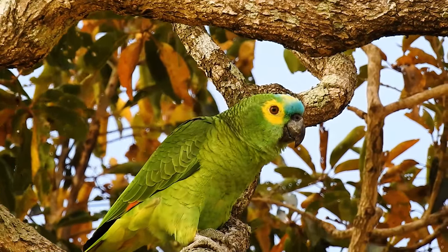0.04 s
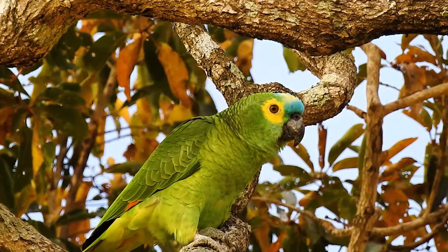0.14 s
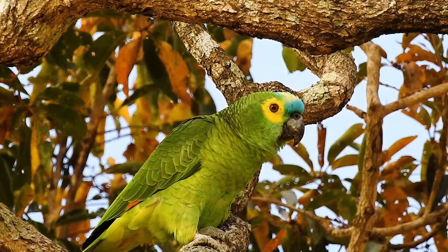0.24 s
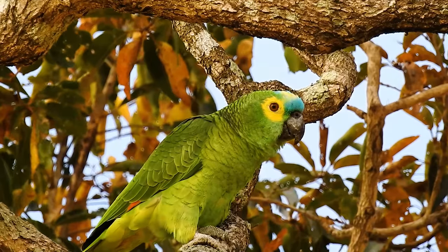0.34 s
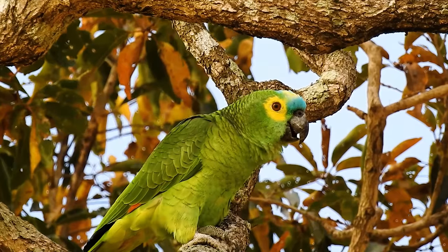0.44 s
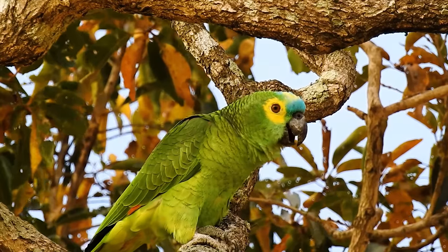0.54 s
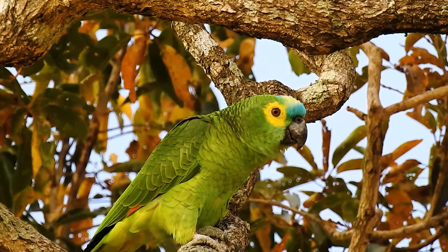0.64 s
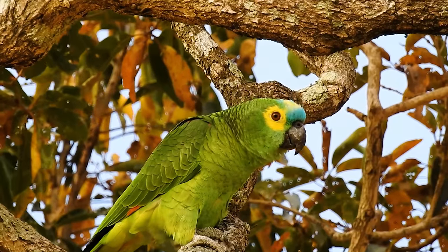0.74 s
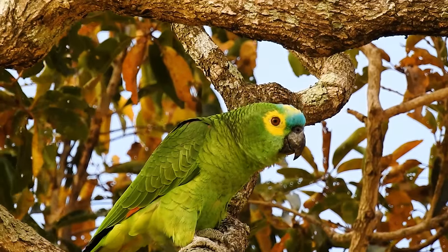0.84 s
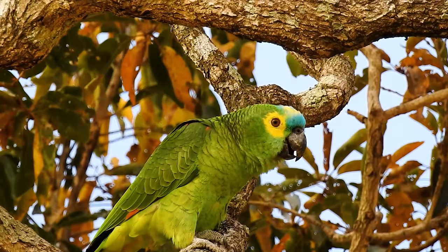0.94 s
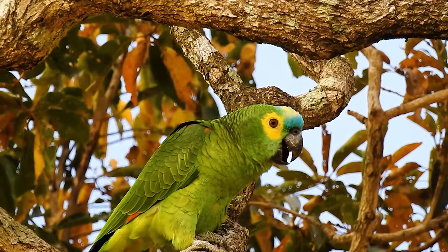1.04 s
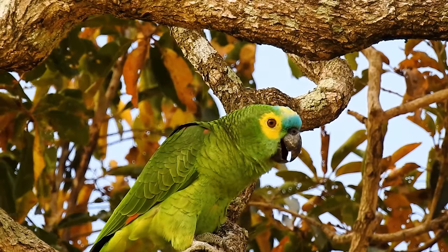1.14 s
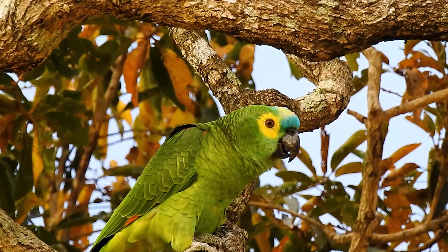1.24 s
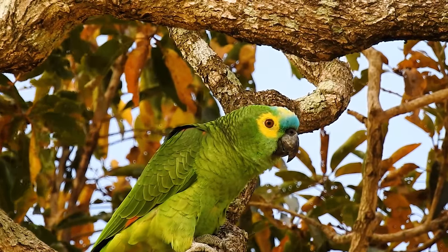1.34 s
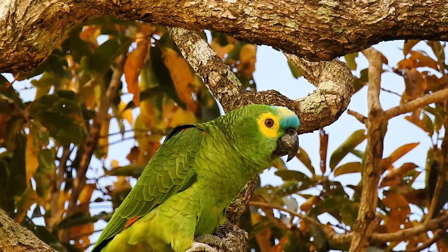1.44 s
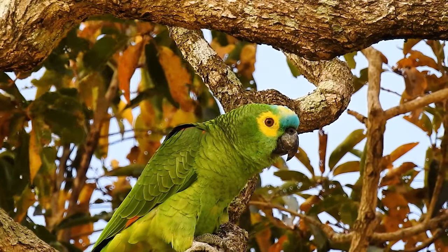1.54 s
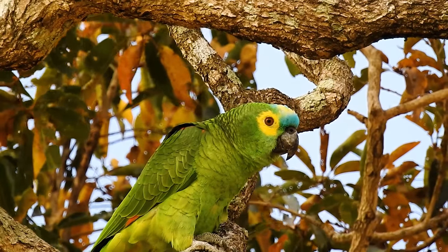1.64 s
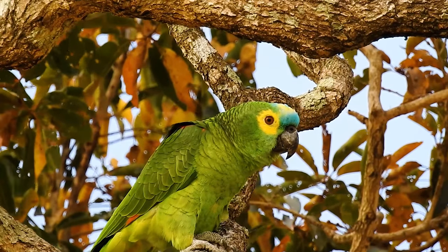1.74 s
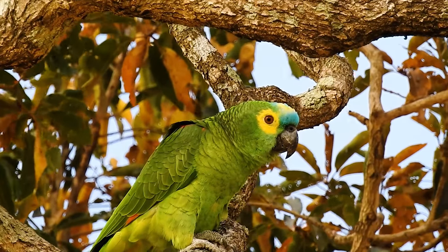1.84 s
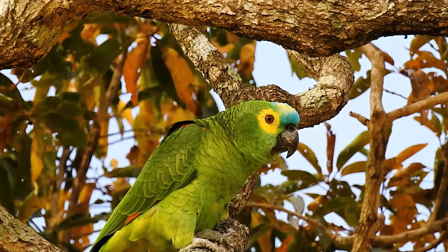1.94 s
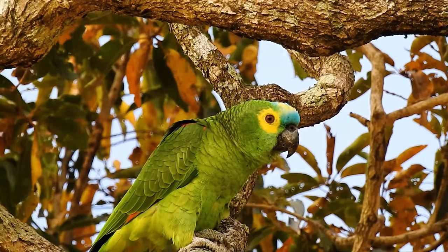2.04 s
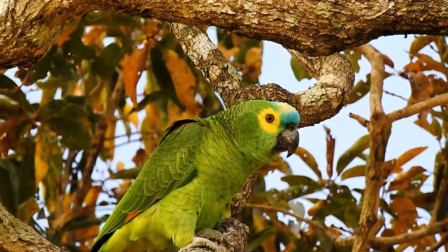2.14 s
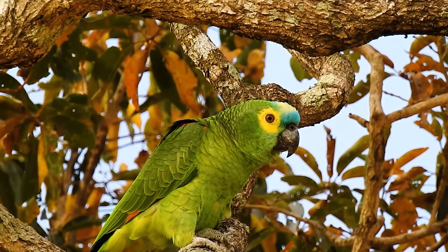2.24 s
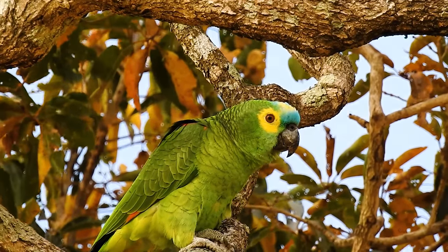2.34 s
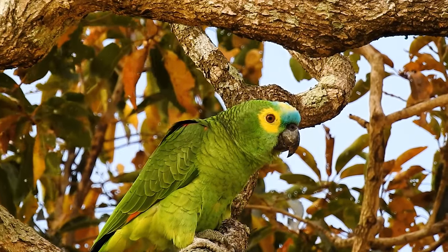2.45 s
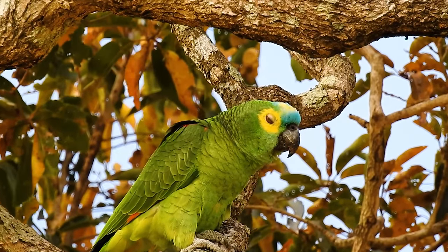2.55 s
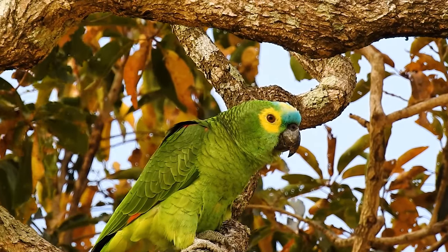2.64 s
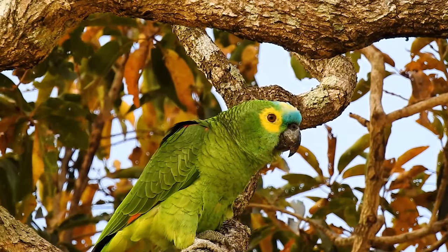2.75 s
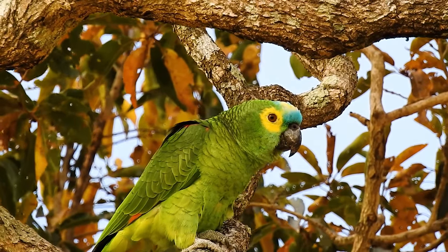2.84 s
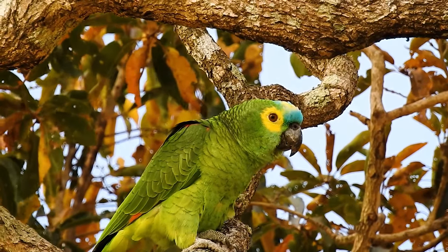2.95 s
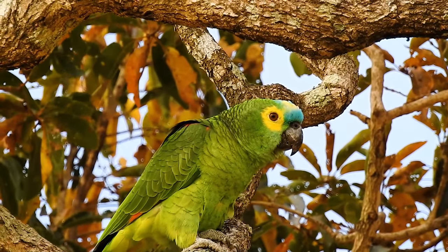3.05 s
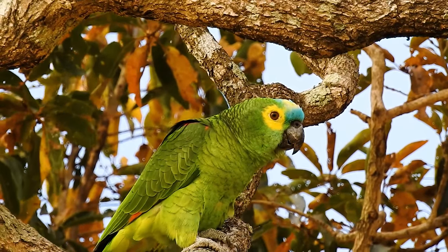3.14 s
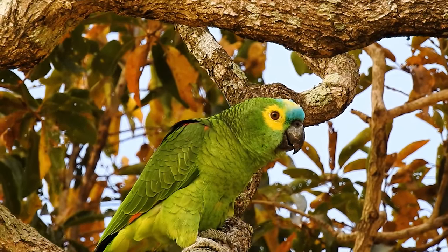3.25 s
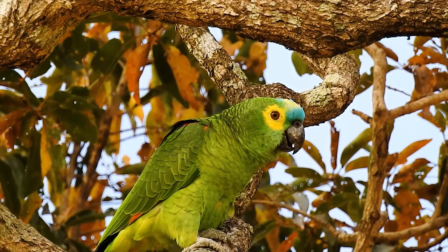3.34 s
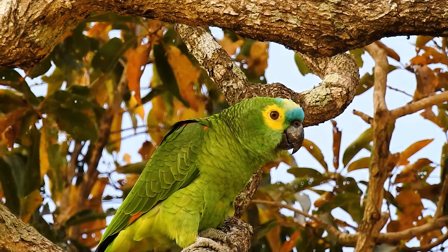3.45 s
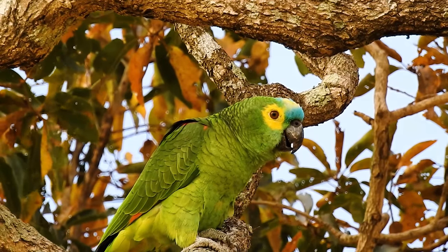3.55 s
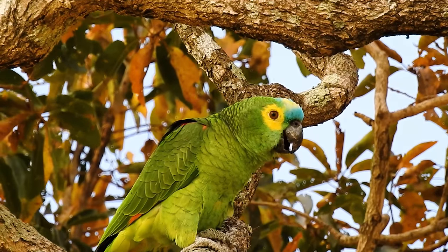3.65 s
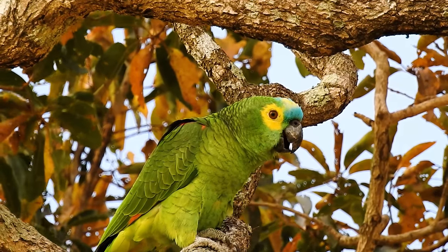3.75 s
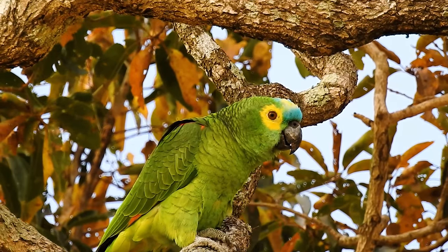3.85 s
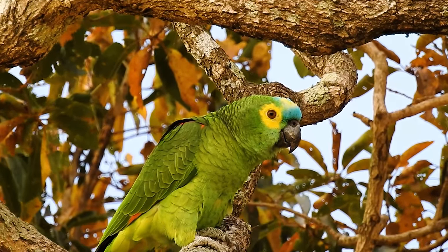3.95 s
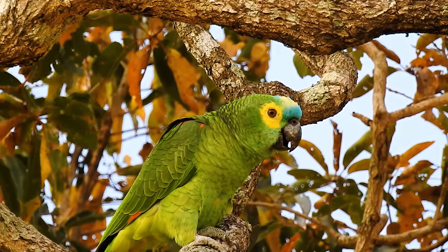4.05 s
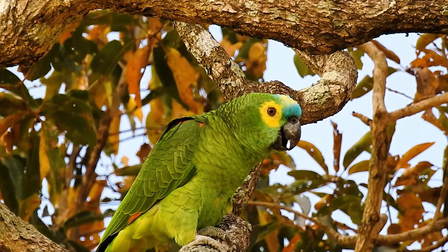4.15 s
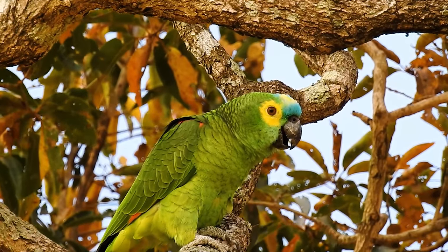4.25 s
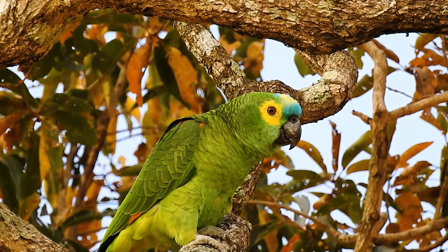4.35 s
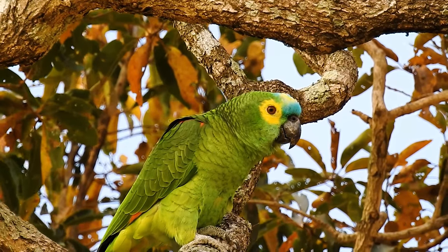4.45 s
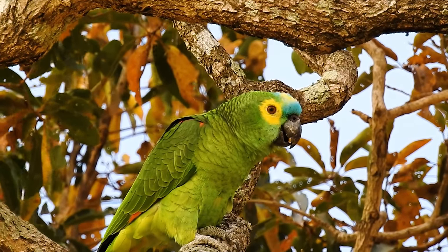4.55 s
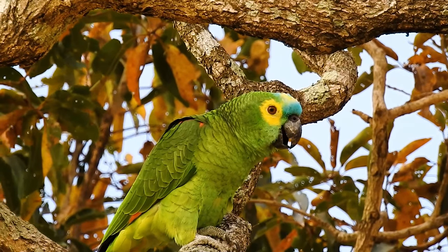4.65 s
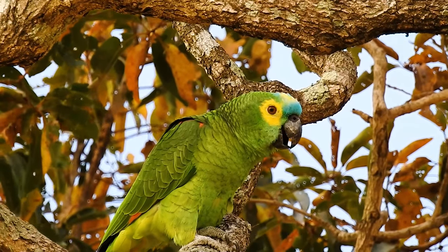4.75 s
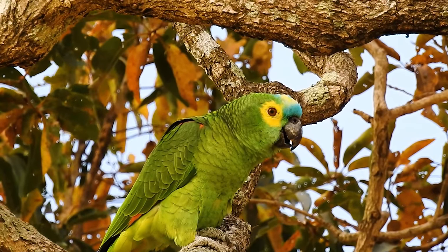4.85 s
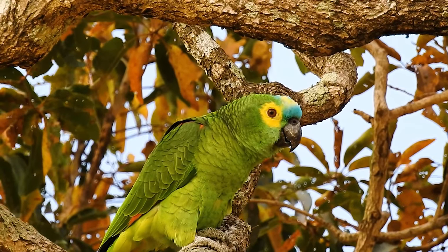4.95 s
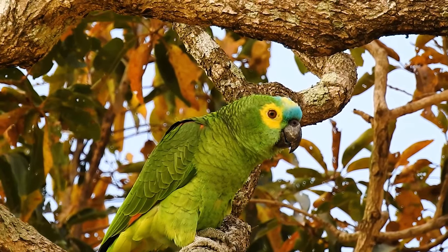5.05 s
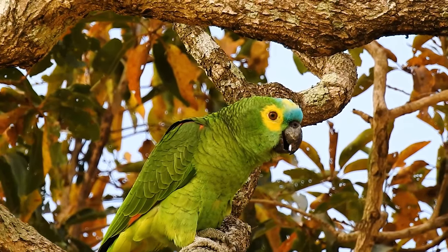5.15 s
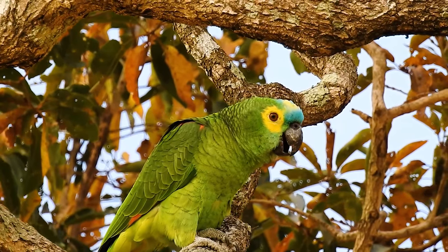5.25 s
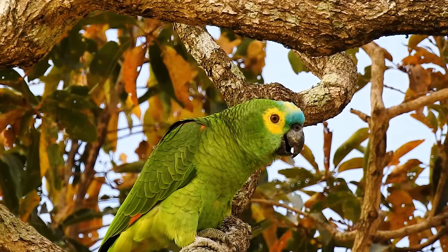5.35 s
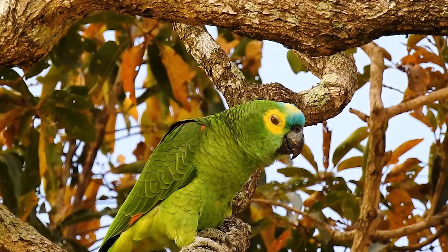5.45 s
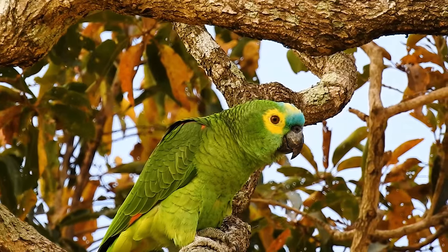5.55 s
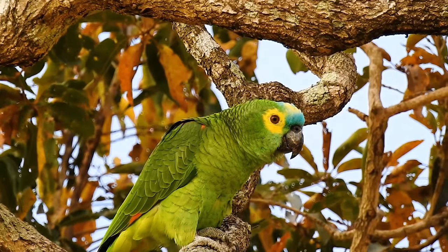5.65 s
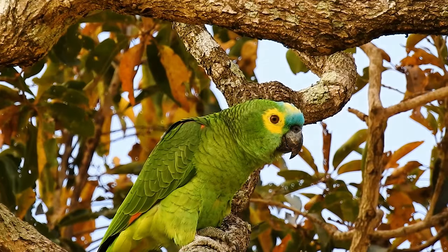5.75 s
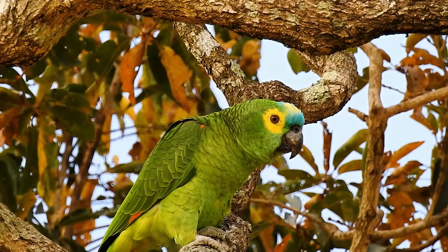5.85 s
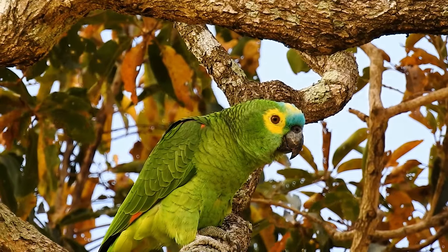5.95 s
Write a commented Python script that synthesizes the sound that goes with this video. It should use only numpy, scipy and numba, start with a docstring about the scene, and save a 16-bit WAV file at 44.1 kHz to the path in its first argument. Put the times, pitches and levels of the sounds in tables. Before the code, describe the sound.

A parrot outdoors gives harsh squawks, clicks its beak, then makes rattling calls that slide into nasal falling cries over soft leaf hiss.

```python
"""A parrot squawks eight times in two bouts, and its beak clicks twice between them.
Its syrinx sends pulses through throat and beak resonances. Some calls crack into a whistle; the last five
open with a fast rattle, and the last four of these end in a falling, nasal glide.
Nearby bark and the trees return the sound; a soft foliage hiss and faint notes of a distant bird lie behind."""
import sys
import numpy as np
from scipy import signal
from scipy.fft import rfft, irfft
from scipy.io import wavfile
from scipy.ndimage import uniform_filter1d
from numba import njit

SR = 44100
rng = np.random.default_rng(int(sys.argv[2]) if len(sys.argv) > 2 else 0)


def inscribe(sig):
    """Save sig as 16-bit PCM at rate SR to the path in sys.argv[1].

    A 1-D sig is mono; a 2-D sig holds one channel per row.
    Samples are clipped to [-1, 1] before scaling.
    """
    pcm = np.round(np.clip(np.atleast_2d(sig).T, -1, 1) * 32767)
    wavfile.write(sys.argv[1], SR, pcm.astype(np.int16))


N = 264159
T = np.arange(N) / SR
TOP_HZ = 15500


def undb(db):
    """Decibels to gain."""
    return 10 ** (np.asarray(db) / 20)


def unit(x):
    """Scale to rms 1."""
    return x / np.sqrt(np.mean(x ** 2))


def smooth(x, seconds):
    """Triangular moving average: two box averages of the given length."""
    size = max(int(seconds * SR), 1)
    once = uniform_filter1d(x, size, mode="constant")
    return uniform_filter1d(once, size, mode="constant")


def steady(x):
    """Hold a sound near rms 1 from moment to moment."""
    power = np.abs(smooth(x ** 2, .005))
    return x / np.sqrt(power + 1e-12)


def walk(rate_hz):
    """Random wandering, rms near 1.5: straight lines between rate_hz random points a second."""
    return 1.8 * np.interp(T * rate_hz, np.arange(N), rng.standard_normal(N))


def over_frequency(hz, values):
    """Join points on a log-frequency axis, for every bin of a spectrum of 2 N samples."""
    bin_hz = np.arange(N + 1) * SR / (2 * N)
    return np.interp(np.log(bin_hz + 1), np.log(hz), values)


def colour(x, gain):
    """Filter with a gain for each bin."""
    return irfft(rfft(x, 2 * N) * gain)[..., :N]


@njit
def resonate(x, hz, width_hz):
    """State-variable band-pass with a moving centre and unit peak gain."""
    y = np.empty(len(x))
    band_state, low_state = 0., 0.
    for i in range(len(x)):
        g = np.tan(np.pi * hz[i] / SR)
        k = width_hz / hz[i]
        band = (band_state + g * (x[i] - low_state)) / (1 + g * (g + k))
        band_state = 2 * band - band_state
        low_state += 2 * g * band
        y[i] = k * band
    return y


def air(level_db=-56.5, side=0.73, sway_db=-1.17, rustle_hz=3700):
    """Distant foliage hisses as coloured noise; its lower part swells with the breeze, the treble stays even."""
    # Spectrum. Each row: frequency in Hz, relative density in dB.
    hiss_points = [(40, -44), (150, -49), (300, -43), (500, -29), (800, -13), (1150, -4), (1800, -0.5),
                   (2400, -3.5), (3200, -2), (4300, -1), (6500, 1.5), (8500, -7), (11000, -12),
                   (15500, -18.5)]
    # Breeze in the part below rustle_hz. Each row: time in seconds, relative level in dB.
    breeze_points = [(0, 1), (.45, 3), (.95, 1.5), (1.6, -2), (2.3, -1), (2.7, -2), (3.1, -0.5),
                     (4.1, -1.5), (5.1, -2), (5.95, -0.5)]
    gain = undb(over_frequency(*np.transpose(hiss_points)))
    mid, wide = rng.standard_normal((2, N))
    hiss = colour(np.array([mid + side * wide, mid - side * wide]), gain)
    low = signal.sosfiltfilt(signal.butter(2, rustle_hz, fs=SR, output="sos"), hiss)
    breeze_db = np.interp(T, *np.transpose(breeze_points)) + sway_db * walk(7.1)
    return undb(level_db) * unit(low * undb(breeze_db) + hiss - low)


def far_bird(waver=.035):
    """A distant bird's notes: sines of wavering pitch under parabolic swells."""
    # Each row: middle in seconds, length in seconds, mean pitch in Hz, peak level in dB.
    far_notes = [(2.355, .08, 1900, -66), (5.91, .11, 2000, -62)]
    out = np.zeros(N)
    unsteady = 1 + waver * walk(210)
    for middle_s, length_s, hz, db in far_notes:
        swell = np.clip(1 - ((T - middle_s) / length_s * 2) ** 2, 0, 1)
        phase = 2 * np.pi * np.cumsum(hz * unsteady) / SR
        out += undb(db) * swell * np.sin(phase)
    return out


def trees(x, near_db=-23, near_t60_s=0.26, far_db=-28):
    """Close branches scatter sound as decaying noise; the grove adds a faint, longer, banded tail."""
    # Grove bands. Each row: centre in Hz, width in Hz, relative level in dB, t60 in seconds.
    grove_bands = [(1394.8, 700, -11.5, 0.56), (2314, 180, 10.5, 0.86), (2800, 1200, -9, 0.69),
                   (4560, 1300, 16.5, 0.4), (6100, 4800, 6, 0.64), (8440, 2700, -8, 0.29)]
    t = T[:SR]
    near = rng.standard_normal((2, SR)) * undb(-60 * t / near_t60_s) * (t > .002)
    far = 0
    for hz, width_hz, db, t60_s in grove_bands:
        edges_hz = hz * np.exp(np.array([-.5, .5]) * width_hz / hz)
        band = signal.butter(2, edges_hz, "band", fs=SR, output="sos")
        noise = signal.sosfilt(band, rng.standard_normal((2, SR)))
        far = far + noise * undb(db - 60 * t / t60_s)
    far = far * np.minimum(t / 0.02, 1)
    response = (undb(near_db) * unit(near) + undb(far_db) * unit(far)) / np.sqrt(SR)
    return signal.fftconvolve(x[None], response, axes=1)[:, :N]


def beak(lowest_hz=3700, scrape=0.54, scrape_t60_s=0.0064):
    """The horny mandibles snap with a tiny scrape and ring for milliseconds, too small to radiate bass."""
    # Each row: start in seconds, peak level in dB.
    clicks = [(2.4605, -23), (2.508, -36.5)]
    # Beak modes. Each row: frequency in Hz, relative level ahead of the band-pass in dB, t60 in seconds.
    beak_modes = [(3400, -24, 0.0079), (4600, 6, 0.013), (5130, 4.5, 0.0062), (5700, 9.5, 0.0072),
                  (6880, -0.5, .005), (8580, -12, 0.0083), (10500, -22, 0.0023)]
    out = np.zeros(N)
    t = T[:SR // 20]
    ring = sum(undb(db - 60 * t / t60_s) * np.sin(2 * np.pi * hz * t) for hz, db, t60_s in beak_modes)
    ring = ring + scrape * rng.standard_normal(len(t)) * undb(-60 * t / scrape_t60_s)
    ring = signal.sosfilt(signal.butter(3, [lowest_hz, 11000], "band", fs=SR, output="sos"), ring)
    ring = ring / np.abs(ring).max()
    for start_s, db in clicks:
        out[int(start_s * SR):][:len(t)] += undb(db) * ring
    return out


def nasal_call(t, start, turn, end, first_hz, top_hz, level_db, swell_db):
    """Pitch climbs through the rattle, then glides down; returns pitch, roughness, level, treble share, gape."""
    # every nasal call falls, ever faster, to the same pitch
    last_hz, fall_bend = 351, 1.5
    fall = np.clip((t - turn) / (end - turn), 0, 1)
    hz = np.interp(t, [start, turn], [first_hz, top_hz]) - (top_hz - last_hz) * fall ** fall_bend

    # the voice swells and mellows as its fifth harmonic falls through the main throat resonance
    swell_hz, swell_width_hz, mellow_db = 2600, 190, -3
    in_tune = (t > turn) * np.exp(-((5 * hz - swell_hz) / swell_width_hz) ** 2)

    attack_s, attack_db, crescendo_db_per_s = 0.047, 14.5, 19
    release_s, release_db = .065, 26
    attack = np.clip(1 - (t - start) / attack_s, 0, 1)
    release = np.clip(1 - (end - t) / release_s, 0, 1)
    db = level_db + crescendo_db_per_s * (t - turn) - attack_db * attack ** 2 - release_db * release ** 2
    db = db + swell_db * in_tune

    # roughness: rattle, clearer glide, rough again as it dies
    rough = np.interp(fall, [0, .3, .6, 1], [.28, .1, .1, .5])
    share_db = np.interp(t, [start, end - release_s], [-2, -1.21]) + mellow_db * in_tune
    gape = np.interp(t, [start, turn], [0.64, 0.9])
    return hz, rough, db, share_db, gape


def calls():
    """Pitch, roughness, level, treble share and gape through all eight calls; next to silent in between."""
    # Three screeches, one curve each. Each row: time in seconds, pitch in Hz, base roughness 0-1,
    # level in dB and treble share in dB ahead of the offsets in parrot(), beak gape 0-1.
    screeches = [
        [(0, 647, 0.31, -9.5, -4.5, 0.86), (.02, 595.5, 0.3, -14.5, 2, 0.72),
         (.033, 590, 0.29, -14.5, -2.5, 0.92), (.06, 526, 0.24, -10, 0.5, 0.44),
         (.072, 474, .5, -22, -1.5, .45), (.092, 421, 0.5, -33, -1, 0.55)],
        [(.56, 414.6, 0.75, -52, -12, 0.05), (.58, 472.4, 0.42, -27, -7.5, 0.27),
         (.597, 611, .19, -26, -4.5, 0.1), (.63, 644, .45, -24.5, -5.5, 0.07), (.65, 701, 0.51, -21.5, -5, 0),
         (.686, 686.8, 0.68, -18, -4.5, 0.6), (.699, 670, 0.02, -19, -6, 0.05),
         (.72, 665.6, 0.13, -21, -11.5, 0.44), (.772, 531, 0.33, -23.5, -5.5, 0.07),
         (.794, 468, 0.7, -53, -13, 0.2)],
        [(1.093, 433, 0.54, -46.5, -11, 0.04), (1.115, 492.6, 0.38, -20, -6, 0.4),
         (1.132, 608.4, .16, -24, -3.5, 0.3), (1.182, 689.6, 0.2, -17.5, -10.5, 0.37),
         (1.215, 691, 0.16, -13.5, -1.5, 0.62), (1.257, 690, 0.14, -15.5, -3, 0.69),
         (1.29, 655.5, 0.44, -9.5, -2.5, 1), (1.314, 588, .24, -19.5, -1.5, 0.9),
         (1.329, 560.6, 0.34, -12.5, -1.5, 0.4), (1.365, 448, 0.65, -21.5, -0.5, 0.43),
         (1.387, 399, 0.33, -44, -13, 0.73)],
    ]
    # The soft call that climbs to a whistle; columns as in the screeches.
    rising_call = [(3.225, 349, 0.41, -53.5, -4, 0.2), (3.285, 400, 0.32, -36.5, -3.5, 0.49),
                   (3.345, 455.2, 0.4, -28, -2.5, 0.99), (3.396, 575, 0.18, -32, -6, .5),
                   (3.413, 617.6, 0.07, -27, -1.5, 0.73), (3.447, 622, 0.17, -29.5, -1, 0.83),
                   (3.467, 678, .75, -23.5, -4, 0.81), (3.484, 680, 0.01, -34.5, -3.5, 0.77),
                   (3.522, 656, 0.18, -32.5, 2.5, 0.8), (3.55, 554.5, 0.52, -43.5, -18, 0.37)]
    # Each row: start, turn from rise to fall and end in seconds, first and top pitch in Hz,
    # level at the turn in dB (ahead of the offset in parrot()), swell in the fall in dB.
    nasal_calls = [(3.72, 3.882, 4.009, 512, 586, -21, 0), (4.198, 4.33, 4.489, 530, 612, -22, 4.5),
                   (4.71, 4.872, 5.034, 520, 620, -22.6, 3.5), (5.273, 5.408, 5.562, 505, 630, -22.7, 4)]
    controls = np.tile([[400.], [.5], [-120.], [-5.], [.5]], N)
    for curve in screeches + [rising_call]:
        times, *columns = np.transpose(curve)
        on = (T >= times[0]) & (T < times[-1])
        controls[:, on] = [np.interp(T[on], times, column) for column in columns]
    for start, turn, end, *voice in nasal_calls:
        on = (T >= start) & (T < end)
        controls[:, on] = nasal_call(T[on], start, turn, end, *voice)
    return controls


def rattle(crest=0.38, sharp=1.423, bend=0.028, stumble=.25, fade_s=0.00865):
    """The airflow throbs ever slower; returns level swing in dB, pitch sag and roughness between throbs."""
    # Each row: first throb in seconds, end in seconds, throbs per second at first, depth at the end in dB.
    rattles = [(3.23, 3.386, 57, 12.5), (3.73, 3.874, 54.7, 11), (4.207, 4.349, 55.1, 10),
               (4.72, 4.931, 53.3, 8), (5.284, 5.445, 55.2, 5)]
    slowing_per_s2, first_depth_db = 40, 16.5
    swing_db, sag, choke = np.zeros((3, N))
    for start, end, rate_hz, last_db in rattles:
        t = T - start
        turn = rate_hz * t - slowing_per_s2 * t ** 2 / 2
        active = np.clip(np.minimum(t + 2 * fade_s, end - T) / fade_s, 0, 1)
        closed = np.abs(np.sin(np.pi * turn)) ** (2 * sharp)
        depth_db = np.interp(T, [start, end], [first_depth_db, last_db])
        swing_db += active * depth_db * (crest - closed)
        sag -= active * bend * np.sin(2 * np.pi * turn)
        choke += active * stumble * closed
    return swing_db, sag, choke


def crack(hz, flip_s=.004, break_rough=.45, break_s=0.003):
    """Pitch flips to a louder whistle and back, breaking up at each flip; returns pitch, extra dB, roughness."""
    # Each row: start in seconds, end in seconds, first pitch in Hz, last pitch in Hz, extra level in dB.
    cracks = [(.622, .632, 2030, 2112, 1), (0.65, 0.664, 1985, 2056, 4), (0.68, .689, 2316, 2249, 3),
              (1.158, 1.171, 1999, 1850, 5.5), (1.223, 1.237, 2653, 2235, 5), (1.262, 1.276, 2596, 2355, 5),
              (3.467, 3.538, 2296, 2325, 3)]
    push_db, broken = np.zeros((2, N))
    for start, end, first_hz, last_hz, extra_db in cracks:
        up = np.interp(T, [start - flip_s, start + flip_s, end - flip_s, end + flip_s], [0, 1, 1, 0])
        whistle_hz = np.interp(T, [start, end], [first_hz, last_hz])
        hz = hz * (whistle_hz / hz) ** (up * up * (3 - 2 * up))
        flips = sum(np.interp(T, [at - 2 * break_s, at, at + 2 * break_s], [0, 1, 0]) for at in (start, end))
        push_db += extra_db * np.maximum(up, flips)
        broken += break_rough * flips
    return hz, push_db, broken


def syrinx(hz, rough, shimmer_db=4, limp=0.22, whistle_hz=1500, purity=0.29):
    """One pulse and puff of hiss a cycle; roughness shakes period and size and alternates strong and weak."""
    jitter, chaos, rasp, hiss = .036, .3, .9, .12
    # in the whistle register the membranes barely touch, so the overtones fall away
    softness = purity * np.clip(hz / whistle_hz - 1, 0, 1)
    hz = hz * np.exp(jitter * rough * walk(600) + chaos * rough ** 3 * walk(350))
    phase = 2 * np.pi * np.cumsum(hz) / SR
    pulses = 0
    for k in range(1, 36):
        below_top = np.clip(TOP_HZ / hz - k, 0, 1)
        pulses = pulses + np.cos(k * phase) * np.exp(-k * softness) * below_top
    size = undb(shimmer_db * rough * walk(500)) * (1 + limp * rough * np.cos(phase / 2))
    breath = unit(rng.standard_normal(N) * (1 + np.cos(phase)))
    return steady(pulses) * size + (hiss + rasp * rough ** 2) * breath


def throat(source, gape, rough):
    """Steep resonances follow the gape; the tongue keeps each trembling, more so when the voice is rough."""
    # Throat and beak resonances, two passes each. Each row: centre in Hz with beak narrow, in Hz with beak
    # wide, width of one pass in Hz, mean level in dB narrow, in dB wide.
    resonances = [(1317, 1176, 444, 1.5, -0.5), (1520, 1666, 250, -2, -9.5), (1660, 2670, 640, -3, 7),
                  (3620, 3514, 645, 0, 5.5), (4070, 4120, 430, -4, 2.5), (4820, 4430, 257, -2, 2),
                  (5130, 6060, 980, -0.5, -8.5), (5620, 6513, 710, -4, 5.5), (6760, 6800, 1190, 0, -6)]
    # What leaves the small beak. Each row: frequency in Hz, gain in dB.
    radiation = [(200, -50), (450, -9.5), (700, -11), (900, -7), (1100, -6), (1500, 8.5), (7000, -3.5),
                 (8400, -1.5), (9300, -8.5), (10200, -6), (12000, 0.5), (15000, -43)]
    wander, flicker_db, leak_db = .018, 2.2, -30
    voice = undb(leak_db) * source
    for narrow_hz, wide_hz, width_hz, narrow_db, wide_db in resonances:
        hz = narrow_hz + gape * (wide_hz - narrow_hz)
        hz = hz * (1 + wander * np.sqrt(rough) * walk(90))
        db = narrow_db + gape * (wide_db - narrow_db) + flicker_db * np.sqrt(rough) * walk(110)
        once = resonate(source, hz, float(width_hz))
        voice = voice + undb(db) * resonate(once, hz, float(width_hz))
    return colour(voice, undb(over_frequency(*np.transpose(radiation))))


def bark(x):
    """Bark right beside the bird adds delayed copies; delays drift as the bird shifts on its perch."""
    # Each row: delay in seconds in the first bout, in the second bout, gain in dB.
    reflections = [(.00081, .0008, -15), (.001953, .001985, -8)]
    # Start and end of the shift, in seconds.
    shift_s = (1.6, 3.1)
    out = x
    for *delays_s, db in reflections:
        delay_s = np.interp(T, shift_s, delays_s)
        out = out + undb(db) * np.interp(T - delay_s, T, x, left=0)
    return out


def parrot(level_db=-5.0, treble_db=-0.7, split_hz=4100, lowest_hz=380):
    """The syrinx rings the throat; effort sets loudness and the share of treble."""
    hz, rough, db, share_db, gape = calls()
    swing_db, sag, choke = rattle()
    hz, push_db, broken = crack(hz * (1 + sag))
    rough = np.clip(rough + choke + broken, 0, 1)
    gape = np.clip(gape, 0, 1)
    voice = bark(throat(syrinx(hz, rough), gape, rough))
    body = signal.sosfiltfilt(signal.butter(6, split_hz, fs=SR, output="sos"), voice)
    # pressing harder shifts power from the body of the voice to its shrill edge
    share = np.clip(undb(share_db + treble_db) ** 2, 0, .85)
    voice = np.sqrt(1 - share) * steady(body) + np.sqrt(share) * steady(voice - body)
    voice = voice * smooth(undb(db + swing_db + push_db + level_db), .001)
    return signal.sosfilt(signal.butter(4, lowest_hz, "high", fs=SR, output="sos"), voice)


def scene():
    """The bird sits nearly straight ahead; level and phase between the channels differ mostly in the treble."""
    # Each row: frequency in Hz, left minus right level in dB, phase lead of the left in radians.
    channel_offsets = [(1000, -.5, 0), (3000, 0, .1), (5500, -.7, 0), (6300, -3.5, 0), (6800, -3, .6),
                       (8000, 0, .4), (12000, 0, .1)]
    bird = parrot() + beak()
    hz, pan_db, lead = np.transpose(channel_offsets)
    half = undb(over_frequency(hz, pan_db) / 2) * np.exp(.5j * over_frequency(hz, lead))
    direct = colour(bird, np.array([half, 1 / half]))
    return direct + trees(bird) + air() + far_bird()


def record(dry):
    """A steep elliptic low-pass cuts the top."""
    return signal.sosfilt(signal.ellip(10, .1, 80, TOP_HZ, fs=SR, output="sos"), dry)


dry = scene()
out = record(dry)
inscribe(out)
```